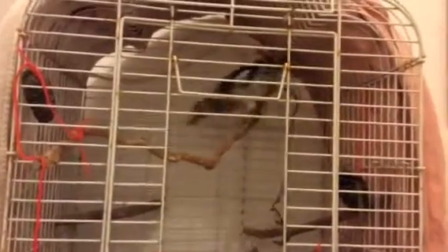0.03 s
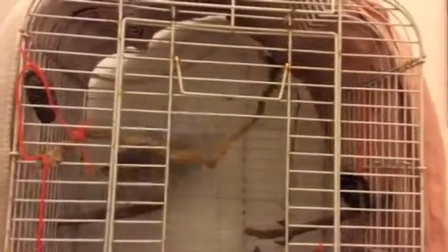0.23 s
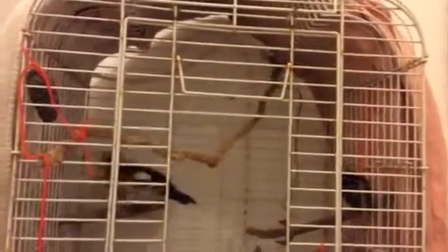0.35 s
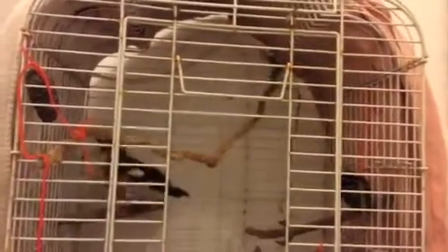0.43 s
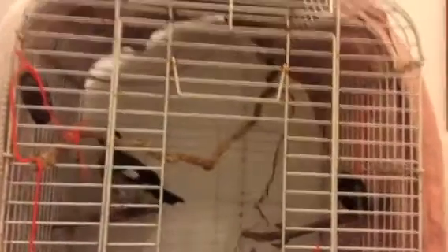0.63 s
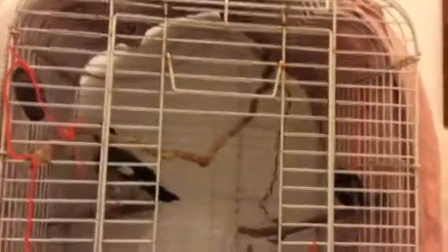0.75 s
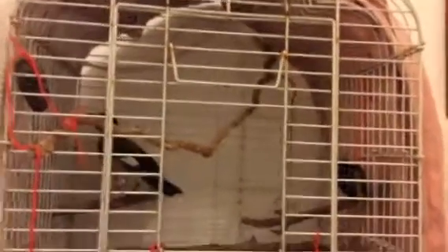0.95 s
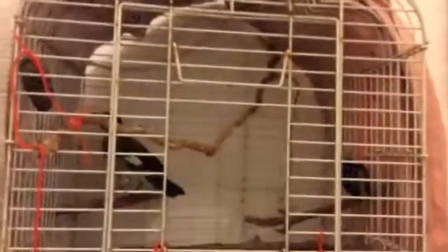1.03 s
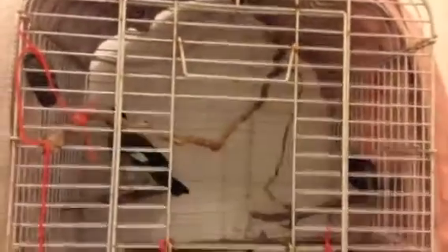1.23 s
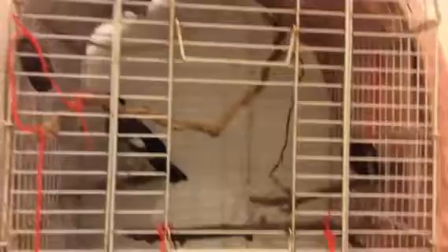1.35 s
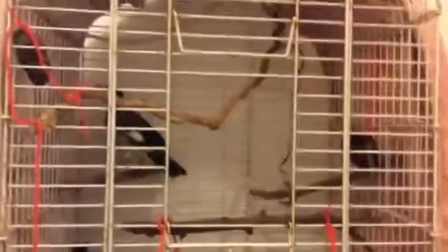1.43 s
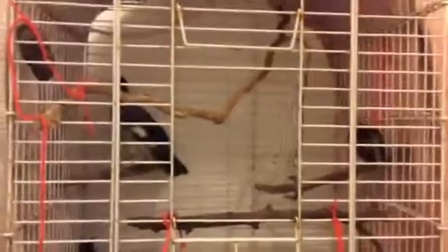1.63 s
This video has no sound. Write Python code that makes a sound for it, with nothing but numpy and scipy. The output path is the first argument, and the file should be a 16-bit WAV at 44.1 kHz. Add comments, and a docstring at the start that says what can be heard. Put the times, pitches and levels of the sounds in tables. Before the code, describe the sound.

A small bird flutters briefly across a wire cage, close to the microphone. The flutter swells into a dull thump and a sharp wing snap, followed by light knocks, a faint hollow ring and scattered claw ticks.

```python
"""A soft scuff and light knocks, close to the microphone: a small bird in a wire cage in a quiet room.
It hops across: feathers flick in a swelling flutter, the wings push a puff of air, brush past
and end in a sharp snap. Wingbeats and feet knock dully, the cage rings hollow, claws tick now and then.
Behind the bird, the room rings faintly over low room tone."""
import sys
import numpy as np
from scipy import signal
from scipy.fft import rfft, irfft
from scipy.io import wavfile

SR = 44100
rng = np.random.default_rng(int(sys.argv[2]) if len(sys.argv) > 2 else 0)


def store_wav(level_fs):
    """Save 16-bit WAV to argv[1]."""
    pcm = np.round(np.clip(np.atleast_2d(level_fs), -1, 1) * 32767)
    wavfile.write(sys.argv[1], SR, pcm.T.astype(np.int16))


N = 74970
T = np.arange(N) / SR
BRIEF = T[:4096]  # time axis of one short event
FREQS = np.fft.rfftfreq(2 * N, 1 / SR)
# Spectrum of a claw's click. Each row: frequency in Hz, level in dB.
CLAW_COLOUR = [(100, -16), (400, -9), (900, -2), (2000, -1.5), (3000, -3), (4500, -3), (6500, -9),
               (10000, -6.5), (15000, -19)]


def undb(db):
    """Decibels to amplitude."""
    return 10 ** (np.asarray(db) / 20)


def response(colour, tilt=0):
    """Causal impulse response, peak 1, of a (Hz, dB) colour tilted in dB per octave."""
    hz, db = np.array(colour, float).T
    n = len(BRIEF)
    octave = np.log2(np.maximum(np.fft.rfftfreq(2 * n, 1 / SR), 1))
    gain = undb(np.interp(octave, np.log2(hz), db + tilt * np.log2(hz)))
    cepstrum = irfft(np.log(gain))
    cepstrum[1:n] *= 2  # fold to minimum phase
    cepstrum[n + 1:] = 0
    h = irfft(np.exp(rfft(cepstrum)))[:n]
    return h / np.abs(h).max()


def through(x, h):
    """Sound x passed through the response h."""
    return signal.fftconvolve(x, h)[:N]


def unit(x):
    """Scale to rms 1."""
    return x / np.std(x)


def add(out, start, x):
    """Mix x in from start, in seconds."""
    i = int(np.clip(start * SR, 0, N - 1))
    out[i:i + len(x)] += x[:N - i]


def fade(t60, t=T):
    """Exponential decay, 60 dB down after t60."""
    return np.exp(-np.log(1000) * t / t60)


def ring(hz, t60, t=BRIEF):
    """One damped mode."""
    return np.sin(2 * np.pi * hz * t) * fade(t60, t)


def soften(x, hz):
    """Low-pass of a padded contact."""
    return signal.sosfilt(signal.butter(2, min(hz, .45 * SR), fs=SR, output="sos"), x)


def burst(decay_s):
    """A puff of noise that dies with the given time constant."""
    return rng.standard_normal(len(BRIEF)) * np.exp(-BRIEF / decay_s)


def room_tone():
    """Steady noise of the quiet room and a narrow, wavering drone that slowly fades."""
    # Spectrum of the steady noise. Each row: frequency in Hz, level in dB.
    colour = [(25, -12.5), (60, 1.5), (130, -2.5), (200, -5.5), (290, -3), (425, -5.5), (560, -8.5),
              (750, -9), (1200, -12.5), (2200, -17.5), (4000, -17), (7000, -19), (14500, -21)]
    drone_hz, width_hz, fall_db_per_s = 426, 75, 7
    air = irfft(rfft(rng.standard_normal(N)) * rfft(response(colour), N), N)
    rolloff = 1 + ((FREQS - drone_hz) / (width_hz / 2)) ** 2
    drone = irfft(rfft(rng.standard_normal(2 * N)) / rolloff)[:N]
    return undb(-70) * unit(air) + undb(-68 - fall_db_per_s * T) * unit(drone)


def soft_rustles():
    """Soft rustling noise: a scuff, a faint wash of room after the first knocks, and late faint rustles."""
    # Each row: start in seconds, length in seconds, level in dB, tilt in dB per octave.
    stretches = [(0.016, .024, -58, -0.5), (0.067, .15, -59.5, 0.5), (1.33, 0.11, -74.5, 2),
                 (1.463, 0.13, -76, 2.5), (1.58, 0.44, -75.5, 5)]
    # Spectrum of the rustling noise. Each row: frequency in Hz, level in dB.
    colour = [(60, -4.5), (130, -5), (300, -10.5), (470, -5.5), (680, 1.5), (900, -12), (1500, -14.5),
              (2400, -21), (4500, -18.5), (6000, -29), (8300, -23.5), (14000, -38)]
    edge = 0.074  # share of the length spent rising, and again falling
    out = np.zeros(N)
    for start, length, db, tilt in stretches:
        swell = np.clip(np.minimum(T - start, start + length - T) / (edge * length), 0, 1)
        out += undb(db) * swell * unit(through(rng.standard_normal(N), response(colour, tilt)))
    return out


def dull_knocks():
    """Short, dull knocks from wingbeats and feet, rounded by the soft contact, with a little grit."""
    # Each row: start in seconds, level in dB, pitch in Hz, t60 in seconds, contact cut-off in Hz.
    knocks = [(0.0256, -45.5, 1070, 0.024, 1900), (0.0282, -40, 258, 0.021, 890),
              (0.0319, -44.5, 900, 0.022, 2000), (0.045, -40, 540, 0.0042, 1040),
              (.111, -49, 653, 0.078, 899), (0.2053, -31, 1300, 0.0063, 2593),
              (0.2462, -20, 1150, 0.011, 2400), (0.2637, -9.5, 600, .007, 2407),
              (0.3219, -24.5, 504.3, 0.0085, 1523), (0.5105, -29, 1753, 0.003, 1772),
              (0.512, -31.5, 620, 0.024, 1996), (0.5238, -26, 955, 0.017, 720),
              (0.5255, -27.5, 768, 0.01676, 700), (0.539, -43, 900, 0.017, 1425)]
    # Modes of one knock. Each row: pitch ratio, level in dB, share of the ring time.
    modes = [(1, -3.5, 1), (1.9, -8.5, 1), (3.3, -21, .4)]
    out = np.zeros(N)
    for start, db, hz, t60, contact_hz in knocks:
        tone = sum(undb(mode_db) * ring(hz * ratio, t60 * share) for ratio, mode_db, share in modes)
        tone = soften(tone, contact_hz)
        grit = undb(-32.5) * burst(decay_s=0.0059)
        add(out, start, undb(db) * (tone / np.abs(tone).max() + grit))
    return out


def air_thumps():
    """Wings and body push air at the microphone; each dull thump swells and dies in a cycle or two."""
    # Each row: time of the peak in seconds, peak level in dB, pitch in Hz, rough fade time in seconds.
    pushes = [(0.0271, -41, 102, 0.0055), (0.052, -44.5, 137, 0.0028), (.085, -53, 135.3, 0.00197),
              (.195, -52.5, 110, .003), (0.2646, -17, 156.5, 0.0031), (0.273, -30.5, 70, 0.0082),
              (0.3269, -29, 161.2, 0.0033), (.517, -46, 100, 0.0025), (0.531, -43, 95, 0.00264),
              (0.551, -53.5, 62, 0.011), (0.651, -53, 67.4, 0.003)]
    out = np.zeros(N)
    for peak_s, db, hz, fade_s in pushes:
        t = T - peak_s
        swell = np.exp(1 - np.hypot(1, 1.3 * t / fade_s))
        out -= undb(db) * np.cos(2 * np.pi * hz * t) * swell
    return out


def claw_ticks():
    """A claw makes one dry click, scrapes for a few milliseconds and briefly rings the spot it touches."""
    # Each row: start in seconds, level in dB, tilt in dB per octave, scrape in dB, spot pitch in Hz.
    ticks = [(0.0459, -47.5, 9, -16, 8900), (0.0589, -57, 32, -20, 9100), (0.1448, -37, 5, -38, 5000),
             (0.177, -40.5, -0.5, -6.5, 3730), (0.1919, -31.5, -2.5, -18, 3500),
             (0.2581, -22.5, -6.5, -18, 4150), (0.291, -29.5, 10, -19, 9800), (0.46, -47.5, -6, -4, 8500),
             (0.4648, -44.5, 1.5, -6, 4260), (.541, -41, -8, -20, 9460), (0.5926, -47.5, -0.5, -38, 5020),
             (0.6784, -41.5, 2, -25.5, 4470), (0.6859, -47, 3, -10.5, 4506), (.804, -47.5, 1.5, -18.5, 906),
             (.8732, -52, 3, -53, 5000), (.9715, -38.5, 2.5, -23, 2689), (1.1756, -41, -1.5, -27, 945.4),
             (1.4071, -54.5, -1, -5.5, 3880), (1.4115, -36.5, -2.5, -13.5, 2050),
             (1.5541, -41.5, -1.5, -13, 2300)]
    out = np.zeros(N)
    for start, db, tilt, scrape_db, hz in ticks:
        contact = undb(scrape_db) * burst(decay_s=.0018)
        contact[0] = 1  # the click ahead of the scrape
        spot = undb(-19.5) * ring(hz, t60=.005)
        add(out, start, undb(db) * through(contact, response(CLAW_COLOUR, tilt) + spot))
    return out


def stray_ticks():
    """Barely heard ticks of claws and feathers, scattered at random."""
    out, click = np.zeros(N), response(CLAW_COLOUR, tilt=1.7)
    for when, size in rng.random((16, 2)):
        add(out, when * N / SR, undb(-56 + 4 * size) * click)
    return out


def feather_flutter():
    """An uneven run of feather flicks, each with its own brief ring, swelling as the wings open."""
    # Spectrum of one flick. Each row: frequency in Hz, level in dB.
    colour = [(60, -23.5), (230, -16.5), (400, 1.5), (950, -1.5), (1500, -1.5), (2300, -13), (3300, -22.5),
              (5000, -25.5), (8000, -34.5), (15000, -48)]
    first_s, last_s, flicks_per_s, jitter = 0.14, .243, 340, .3
    last_db, swell_db_per_s, scatter_db = -25.5, 266, 3.5
    quill_hz, spread_octaves = 1500, 0.13
    out, flick = np.zeros(N), response(colour)
    for k, (early, size, pitch) in enumerate(rng.standard_normal((128, 3))):
        start = last_s - (k + jitter * early) / flicks_per_s  # counted back from the last flick
        if start > first_s:
            hz = quill_hz * 2 ** (spread_octaves * pitch)
            quill = undb(-12.5) * soften(ring(hz, t60=0.0017), 2 * hz)
            db = last_db - swell_db_per_s * (last_s - start) + scatter_db * size
            add(out, start, undb(db) * (quill - flick))
    return out


def wing_brush():
    """Dense tiny slips of feather on feather pass the microphone and fall away sharply at the snap."""
    # Loudness of the pass. Each row: time in seconds, level in dB.
    contour = [(0.149, -72), (0.188, -55), (.225, -50.5), (.255, -40.5), (.27, -39), (0.277, -26.5),
               (0.287, -35.5), (0.298, -21), (0.2978, -32), (.302, -59), (.32, -63)]
    # Spectrum of sliding feathers. Each row: frequency in Hz, level in dB.
    colour = [(50, -7.5), (200, -8), (400, -6.5), (800, 3.5), (1600, -3.5), (2600, -4.5), (4300, -10.5),
              (6000, -19), (7500, -22), (10000, -28), (15000, -28.5)]
    grain_db = 2.5
    slips = rng.standard_normal(N) * undb(grain_db * np.minimum(rng.exponential(size=N), 5))
    times, db = np.array(contour).T
    level = undb(np.interp(T, times, db, left=-np.inf, right=-np.inf))
    return unit(through(slips, response(colour))) * level


def wing_snap():
    """The wing tip catches and flicks free: a push, then a pull."""
    # Each row: start in seconds, peak level in dB.
    pulses = [(.2976, -13), (.29795, -3.5)]
    # Spectrum of the snap. Each row: frequency in Hz, level in dB.
    colour = [(60, -32), (160, -20.5), (350, -3.5), (800, 6.5), (1700, -8.5), (2700, -1), (4000, -0.5),
              (5000, -10.5), (5900, -19.5), (7000, -11), (8100, -12), (9200, -33.5), (12500, -24.5),
              (15000, -31.5)]
    out, crack = np.zeros(N), response(colour)
    for k, (start, db) in enumerate(pulses):
        add(out, start, (-1) ** k * undb(db) * crack)
    return out


def cage_ring():
    """A few hollow modes of the cage build up after the landing and die away."""
    # Each row: frequency in Hz, level in dB, t60 in seconds.
    modes = [(479, -38.5, 0.53), (566, -47.5, 0.39), (664, -43, 0.44), (1165, -53.5, .35)]
    landing_s, build_s = .325, 0.025
    build = np.clip(T / build_s, 0, 1)
    out = np.zeros(N)
    add(out, landing_s, build * sum(undb(db) * ring(hz, t60, T) for hz, db, t60 in modes))
    return out


def room_tail(x):
    """The room answers x with a late diffuse tail, shorter in the treble."""
    # Each row: band centre in Hz, level in dB, t60 in seconds.
    bands = [(60.48, -18, 0.61), (150, -26, 0.57), (288, -21.5, 1), (470, -10, .6), (800, -18.5, 0.29),
             (1170, -16.5, 0.51), (1980, -18, .5), (4200, -23, .47), (6239.6, -20.5, 0.47),
             (8000, -26, 0.32), (10820, -18, 0.33), (15000, -29, .2)]
    delay_s, build_s = 0.016, .012
    hz, db, t60 = np.array(bands).T
    noise, tail = rfft(rng.standard_normal(2 * N)), 0
    for k, share in enumerate(np.eye(len(hz))):
        band = irfft(noise * np.interp(np.log(FREQS + 1), np.log(hz), share))[:N]
        decay = fade(t60[k])
        tail = tail + undb(db[k]) * band * decay / np.linalg.norm(decay)
    return through(x, tail * np.clip((T - delay_s) / build_s, 0, 1))


def scene():
    """One microphone close to the cage: the bird in front, the room faint behind it."""
    rustles = soft_rustles()
    wings = air_thumps() + feather_flutter() + wing_brush() + wing_snap()
    knocks = dull_knocks()
    claws = claw_ticks() + stray_ticks()
    tail = room_tail(rustles + wings + undb(-2) * knocks + undb(1.5) * claws)
    return (rustles + wings + knocks + claws + cage_ring() + tail + room_tone())[None]


def record(dry):
    """The microphone drops the deepest bass and the very top."""
    low_hz, top_hz = 38, 15100
    thin = signal.sosfilt(signal.butter(2, low_hz, "high", fs=SR, output="sos"), dry)
    return signal.sosfilt(signal.ellip(8, .2, 70, top_hz, fs=SR, output="sos"), thin)


dry = scene()
out = record(dry)
store_wav(out)
```